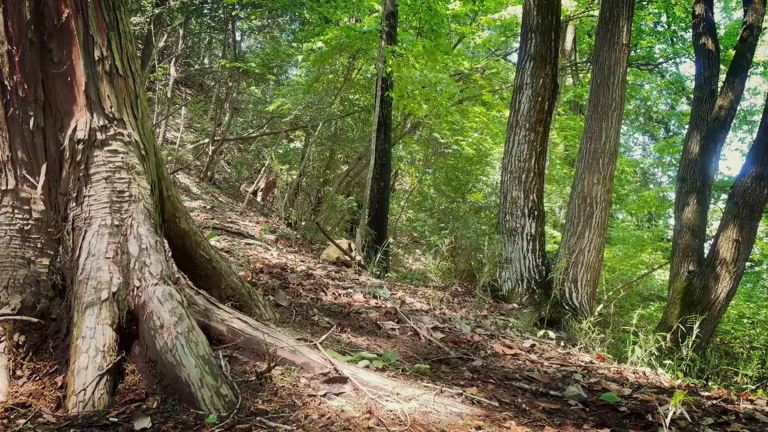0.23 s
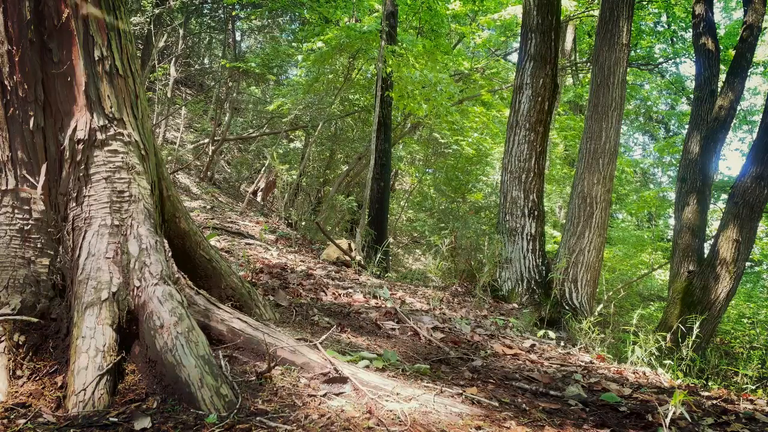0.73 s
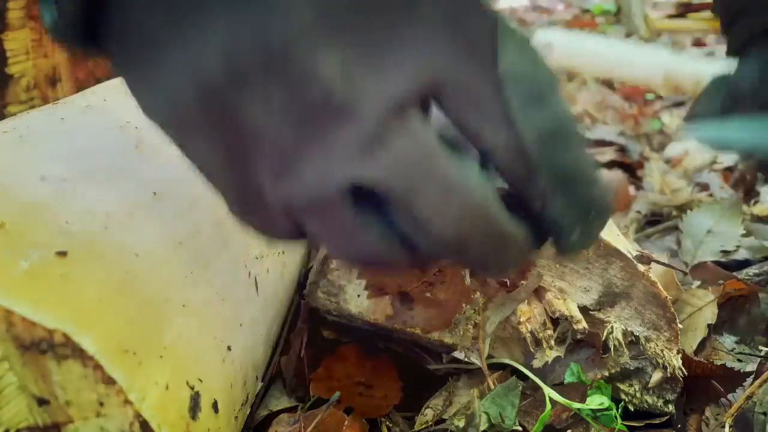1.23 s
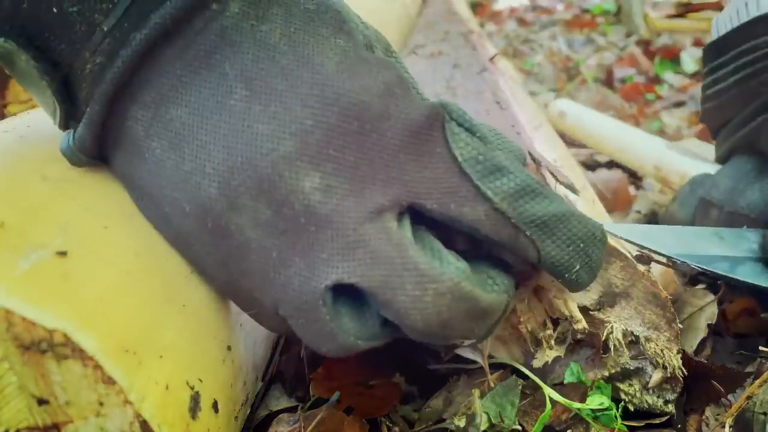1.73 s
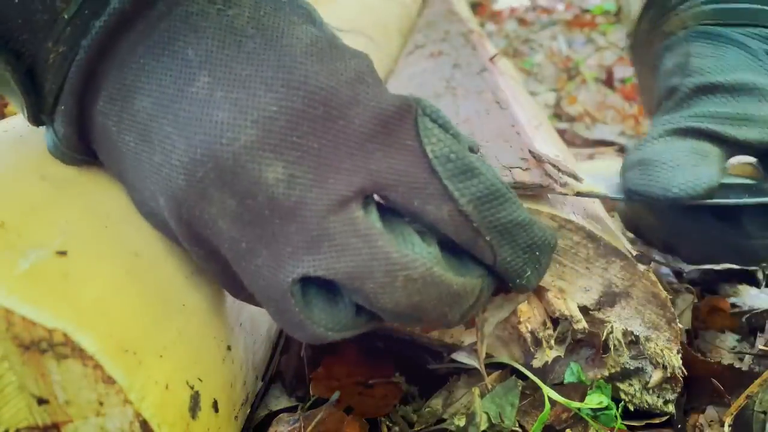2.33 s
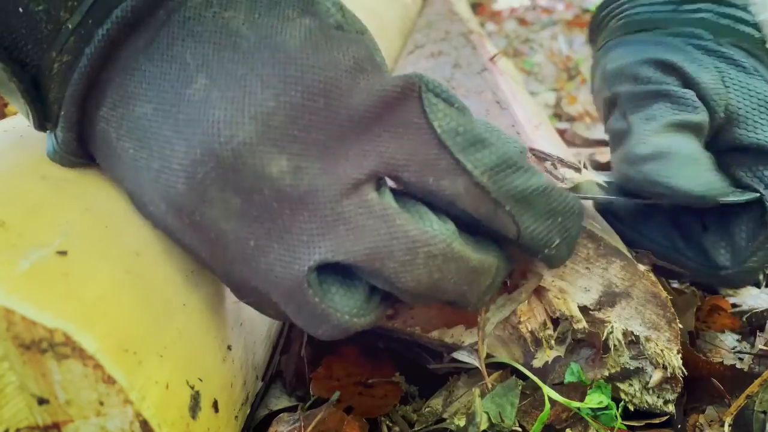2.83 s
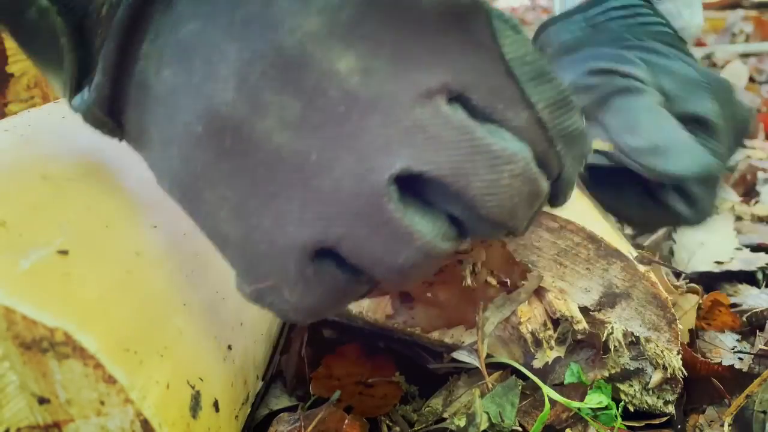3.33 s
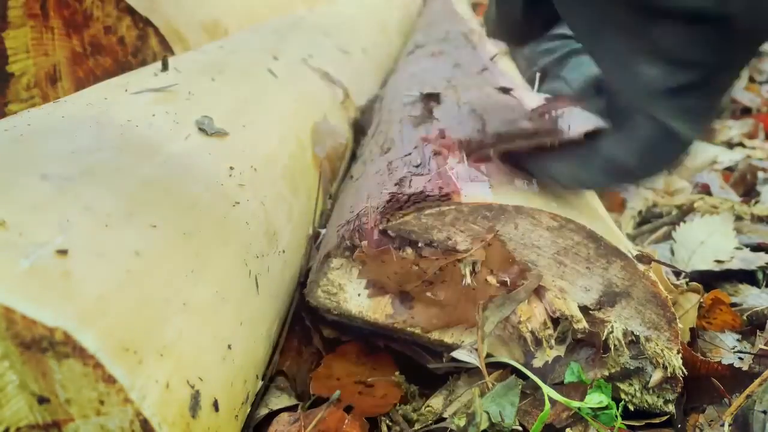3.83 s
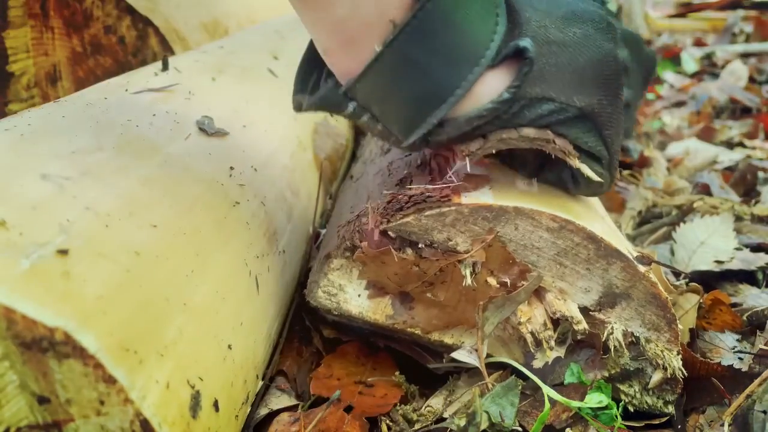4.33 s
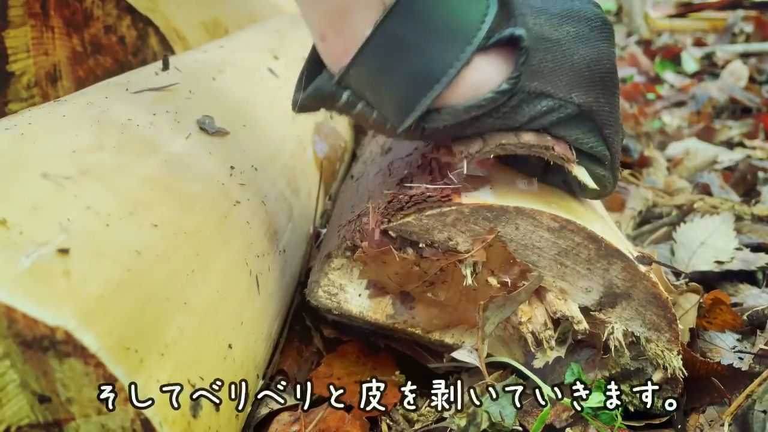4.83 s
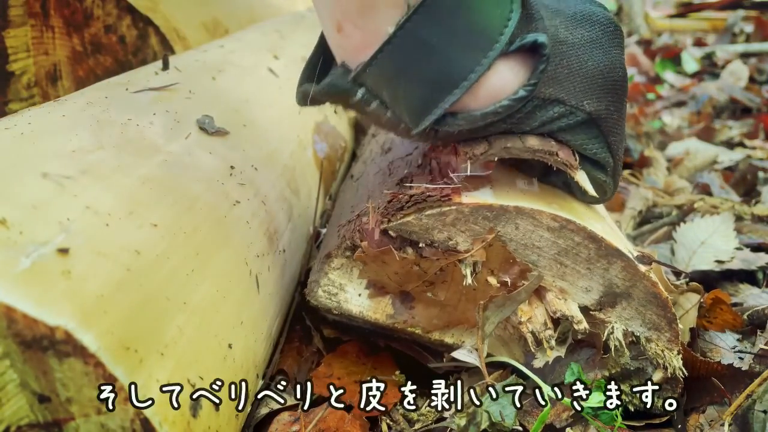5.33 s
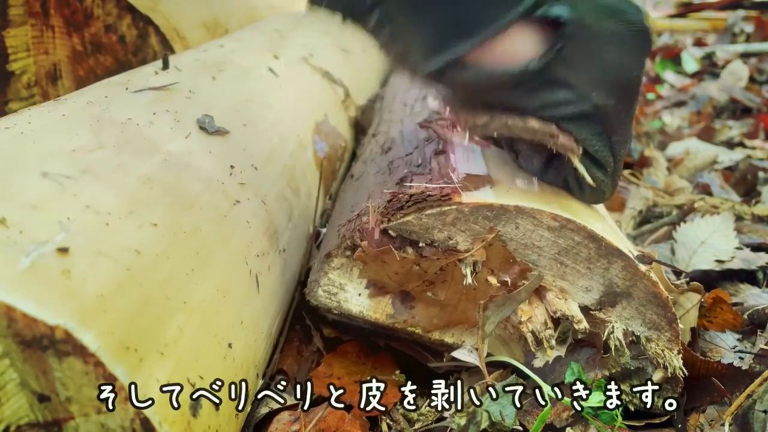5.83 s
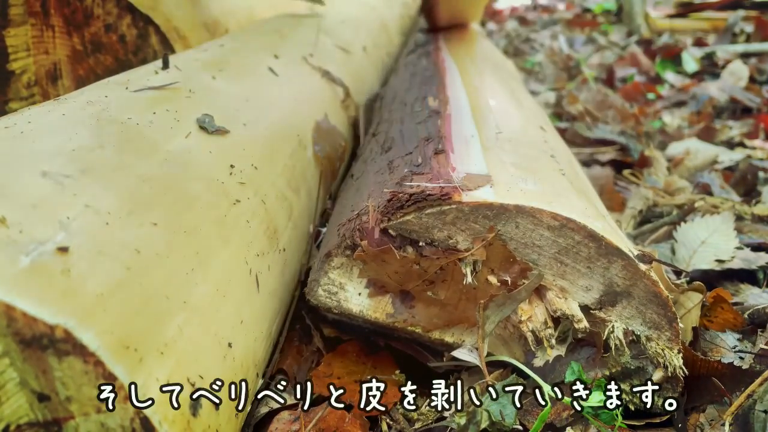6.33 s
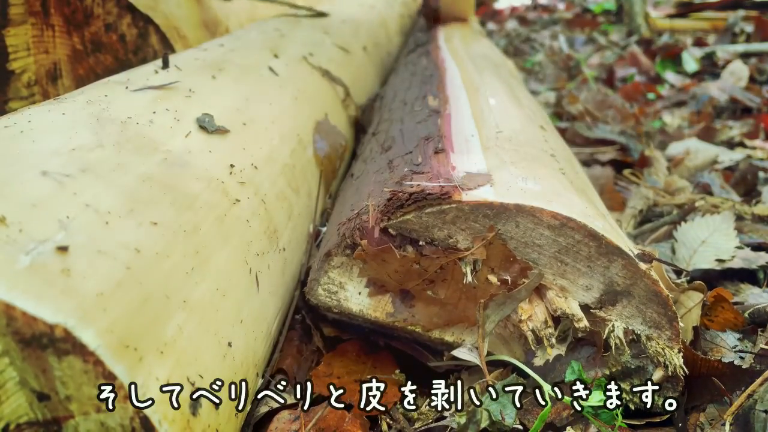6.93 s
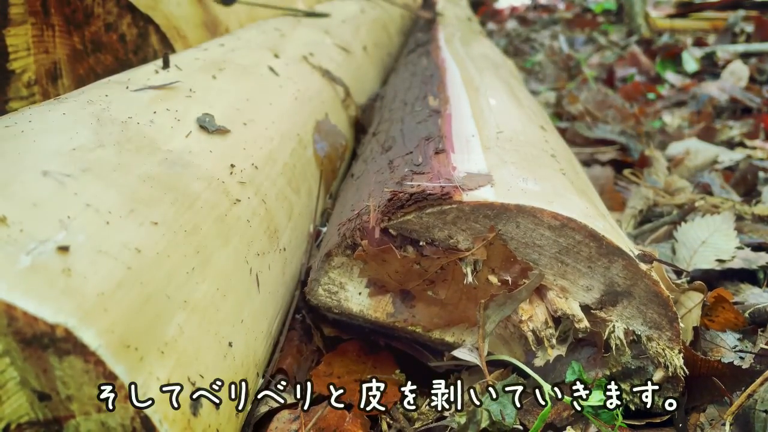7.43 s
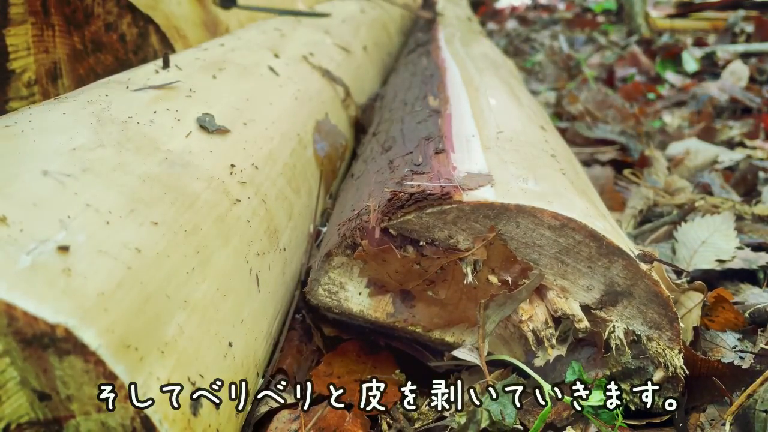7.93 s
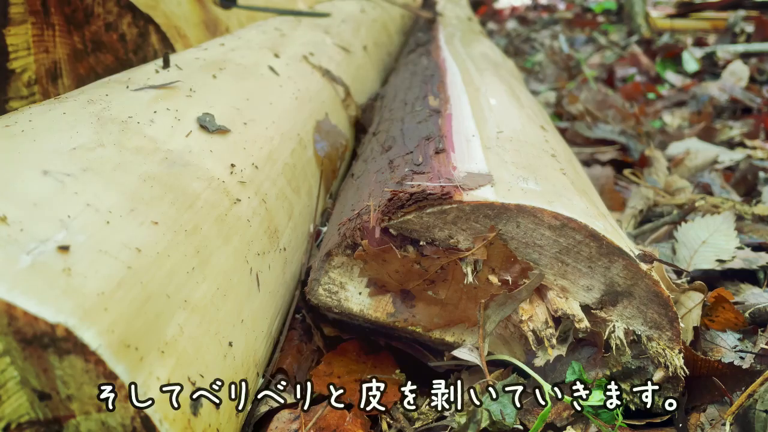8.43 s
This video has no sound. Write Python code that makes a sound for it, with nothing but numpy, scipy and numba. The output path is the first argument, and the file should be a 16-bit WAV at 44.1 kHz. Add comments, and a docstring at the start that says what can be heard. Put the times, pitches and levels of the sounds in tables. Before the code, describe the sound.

Leaves hiss in a light breeze and a small bird whistles briefly. An abrupt cut brings close, dry log work: soft glove rubs, dull wooden knocks, a short blade scrape and a small crackling peel. A knife clatters onto the wood, then a long bark strip rips away with dense sharp snaps. Faint rubbing follows over a low outdoor rumble, heard through a close stereo microphone.

```python
"""A forest hisses (filtered noise) and a small bird calls (gliding sines); then, close up, gloves rub a log.
Blade knocks ring the log's modes, the edge scrapes under the bark and a first flap is peeled (break trains).
The knife clatters down on the wood, waking its steel modes; then a long strip rips off: a dense crackle of
fibre breaks with loud single snaps, ringing the log. Rubs and small knocks follow over a low rumble."""
import sys
import numpy as np
from scipy import signal
from scipy.fft import rfft, irfft, next_fast_len
from scipy.io import wavfile
from numba import njit

SR = 44100
rng = np.random.default_rng(int(sys.argv[2]) if len(sys.argv) > 2 else 0)


def persist_wave(psi):
    """Save psi, clipped to +-1, as 16-bit WAV."""
    counts = np.round(np.clip(psi, -1, 1) * 32767).astype(np.int16)
    wavfile.write(sys.argv[1], SR, np.atleast_2d(counts).T)


N = 383669
TIME = np.arange(N) / SR
HIT_TIME = TIME[:SR // 2]

# modes of the log: mode_hz, level_db, t60_s
LOG_MODES = [(137, -9.5, .25), (205.2, 0.5, 0.34), (266, -12, 0.11), (323.8, -3, 0.36), (379.6, -1, .19),
             (490, -7, 0.051), (572, -5, 0.24), (674, -1.5, .06), (759.5, -2.5, 0.18), (830, -6.5, 0.054),
             (954.5, -9, 0.21), (1090, -3.5, 0.18), (1210, -3, .06), (1540, -2, 0.08), (1920, -4.5, 0.063)]
# spectrum of steel or crumbs on bark: freq_hz, level_db (per Hz)
STEEL_ON_BARK = [(100, 10), (350, -12), (1000, -10), (2200, -4), (4000, 0), (7000, 0), (10000, 4.5),
                 (12800, -3.5), (15500, -1)]


def undb(db):
    """Decibels to gain."""
    return np.exp(np.asarray(db) * np.log(10) / 20)


def unit(x):
    """Scale to rms 1."""
    return x / np.sqrt(np.mean(x ** 2))


def along(points, hz):
    """Read (Hz, value) points on a log-frequency axis."""
    f, value = np.transpose(points)
    return np.interp(np.log(hz + 1), np.log(f), value)


def colour(x, points):
    """Filter a sound by (Hz, dB) points."""
    size = next_fast_len(N, True)
    gain = undb(along(points, np.fft.rfftfreq(size, 1 / SR)))
    return irfft(rfft(x, size) * gain, size)[:N]


def walk(rate):
    """Random wander of spread near 1: straight lines between `rate` points per second."""
    steps = rng.standard_normal(N // 10)
    return np.interp(TIME * rate, np.arange(len(steps)), steps)


def add(track, s, sound):
    """Mix a sound in at time s."""
    i = int(s * SR)
    track[i:i + len(sound)] += sound[:N - i]


def hump(hz, centre_hz, octaves):
    """A bell-shaped weight on the octave axis."""
    return np.exp(-.5 * (np.log2((hz + 1) / centre_hz) / octaves) ** 2)


def stroke(start_s, length_s, attack_s, release_s):
    """Gain of one movement: it swells up to its start, holds for its length, then dies away."""
    early = np.maximum(start_s - TIME, 0)
    late = np.maximum(TIME - start_s - length_s, 0)
    return np.exp(-early / attack_s - late / release_s)


def strokes(rows, attack_s, release_s):
    """Gain of (start_s, length_s, level_db) movements of one shape; overlaps add in power."""
    power = sum((undb(db) * stroke(s, length, attack_s, release_s)) ** 2 for s, length, db in rows)
    return np.sqrt(power)


def grains(rate, spread_db, clump_db, clump_rate):
    """Tiny breaks of very uneven size that come in clumps; rms 1."""
    sizes = undb(spread_db * np.minimum(rng.exponential(size=N), 4))
    breaks = (rng.random(N) < rate / SR) * rng.choice([-1, 1], N)
    return unit(breaks * sizes * undb(clump_db * walk(clump_rate)))


def ring(modes, weight=1, length=1, wobble_db=2.5, size=256):
    """Modes after one blow; each contact shifts them a little, loose contacts make the decay uneven."""
    wobble_per_s = 65
    hz, db, t60 = np.transpose(modes)
    hz = hz * (1 + .002 * rng.standard_normal(len(hz)))
    phase = rng.uniform(0, 2 * np.pi, (len(hz), 1))
    walks = rng.standard_normal((len(hz), size))
    wobble = np.array([np.interp(HIT_TIME * wobble_per_s, np.arange(size), steps) for steps in walks])
    wobble = wobble * np.minimum(HIT_TIME * wobble_per_s, 1)
    fall_db = wobble_db * wobble - 60 * HIT_TIME / (length * t60[:, None])
    tones = np.sin(2 * np.pi * hz[:, None] * HIT_TIME + phase)
    return (undb(db) * weight) @ (tones * undb(fall_db))


def crack(hz, octaves, tail_s, tail_db, bend_s, size=4096):
    """A click and its short scatter, peak 1; bending waves bring the treble first."""
    f = np.fft.rfftfreq(size, 1 / SR)
    push = undb(tail_db) * rng.standard_normal(size) * np.exp(-TIME[:size] / tail_s)
    push[0] += 1
    delay = bend_s * np.sqrt(hz / (f + 1))
    click = irfft(rfft(push) * hump(f, hz, octaves) * np.exp(-4j * np.pi * f * delay))
    return click / np.abs(click).max()


def friction(force, spectrum, log_db):
    """A train of small breaks, heard directly and through the log, whose ring the hand shortens."""
    direct = colour(force, spectrum)
    weight = hump(np.transpose(LOG_MODES)[0], 720, octaves=1.1)
    body = signal.fftconvolve(force, ring(LOG_MODES, weight, length=0.72))[:N]
    return (unit(direct) + undb(log_db) * unit(body)) * np.sqrt(np.mean(force ** 2))


@njit
def resonate(x, hz, width):
    """A state-variable band-pass whose centre moves."""
    y, band, low = np.empty(len(x)), 0., 0.
    for i in range(len(x)):
        g, k = np.tan(np.pi * hz[i] / SR), width / hz[i]
        v = (band + g * (x[i] + 1e-18 - low)) / (1 + g * (g + k))
        band, low, y[i] = 2 * v - band, low + 2 * g * v, k * v
    return y


def flap(force, start_s, start_hz, climb_hz_per_s):
    """Fibre breaks ring the lifted bark, higher as it is drawn taut."""
    hz = np.clip(start_hz + climb_hz_per_s * (TIME - start_s), 2000, 9000)
    tone = unit(resonate(force, hz, 2600.0))  # width in Hz
    return undb(-5) * tone * np.sqrt(np.mean(force ** 2))


def tearing():
    """A slow peel parts fine fibres; the hard rip parts them in bunches and breaks duller splinters too."""
    # spectra of the breaks: freq_hz, level_db (per Hz)
    fibre_spectrum = [(60, 9), (200, -5), (900, -17), (1400, -12.5), (2100, -7.5), (3000, -10), (4800, 2.5),
                      (6500, -1.5), (8300, -1.5), (10500, 1.5), (12600, -14), (15300, -26)]
    splinter_spectrum = [(60, -17), (190, -5.5), (450, -6), (1000, -6), (1500, 2), (2050, -19), (3200, 1),
                         (6000, -11.5), (15500, -15.5)]
    # pulls of the slow peel: start_s, length_s, level_db
    peel_pulls = [(4.431, 0.17, -39.5), (4.68, 0.11, -41.5)]
    # the strip catches, a brief dip: centre_s, half_width_s (to 1/e of depth), depth_db
    catches = [(7.031, .004, -6), (7.084, .004, -8), (7.101, .005, -8.5), (7.182, .006, -5.5),
               (7.211, .006, -3), (7.313, .005, -3)]
    # the strip starts to lift, runs free, parts from the log
    rip_start_s, rip_free_s, rip_end_s = 6.92, 7.112, 7.334

    pull = strokes(peel_pulls, attack_s=0.041, release_s=0.0165)
    peel = pull * grains(rate=3500, spread_db=1.5, clump_db=1.0, clump_rate=260)

    rip = stroke(rip_start_s, rip_end_s - rip_start_s, attack_s=0.024, release_s=0.003)
    dip_db = sum(db * np.exp(-((TIME - s) / half_width) ** 2) for s, half_width, db in catches)
    rip = rip * undb(dip_db)
    until_free_s = np.maximum(rip_free_s - TIME, 0)
    since_free_s = np.maximum(TIME - rip_free_s, 0)
    # fibres grow louder as the strip gathers speed, then hold; splinters fall off once it runs free
    fine_db = -27 - 50.5 * until_free_s
    coarse_db = -31.5 - 31.5 * until_free_s - 53.5 * since_free_s
    fine = rip * undb(fine_db) * grains(rate=3000, spread_db=3.0, clump_db=2.5, clump_rate=500)
    coarse_gain = rip * undb(coarse_db) + pull * undb(-15)
    coarse = coarse_gain * grains(rate=900, spread_db=5.0, clump_db=2.0, clump_rate=200)

    out = flap(peel, peel_pulls[0][0], start_hz=3950, climb_hz_per_s=5800)
    out = out + flap(fine, rip_start_s, start_hz=3300, climb_hz_per_s=7500)
    out = out + friction(peel, fibre_spectrum, log_db=-18.5)
    out = out + friction(fine, fibre_spectrum, log_db=-20.0)
    return out + friction(coarse, splinter_spectrum, log_db=-12.5)


def snaps():
    """Thick fibres fray for an instant, then let go one at a time, each a pitched tick of a few cycles."""
    # snapping fibres and splinters: time_s, peak_db, pitch_hz, spread_octaves
    snap_rows = [(2.72, -33, 1800, .9), (3.425, -15, 7000, .7), (3.686, -30.5, 2300, 1),
                 (3.820, -30, 3000, .7), (4.511, -20, 4500, .6), (4.552, -14, 7960, .8),
                 (4.5973, -25, 8300, .7), (4.662, -29, 4800, .7), (4.671, -20.5, 8200, .7),
                 (4.723, -19.5, 6000, .7), (5.185, -25, 7800, .9), (6.136, -22.5, 3860, 1),
                 (6.562, -21.5, 4300, .9), (6.641, -18.5, 7400, .7), (6.662, -5.5, 3480, 1.04),
                 (6.714, -28, 4054, .7), (6.875, -14.5, 3800, 1), (6.8986, -15.5, 5800, .9),
                 (6.9042, -10, 3350, 1), (6.922, -13, 4200, .7), (6.93, -13, 2800, .8),
                 (6.9348, -10.5, 5000, .7), (6.943, -17, 6000, .7), (6.956, -7.5, 3100, .65),
                 (6.9782, -5, 5000, .8), (6.9804, -9.5, 5400, .7), (7.001, -17, 3000, .6),
                 (7.013, -12.5, 6500, .8), (7.0193, -11.5, 5200, .7), (7.028, -15.5, 5000, .9),
                 (7.0403, 0, 4200, 1), (7.0447, -13, 1800, .9), (7.0533, -5.5, 6500, .9),
                 (7.0603, -4.5, 3200, .9), (7.081, 0.5, 5400, 1.1), (7.1066, -2.5, 5500, 1.1),
                 (7.125, -10.5, 4200, .7), (7.132, -2, 4700, .8), (7.137, -9, 3800, .7),
                 (7.143, -7.5, 6400, .7), (7.1487, -7, 3600, .9), (7.1562, -3.5, 5000, .8),
                 (7.1583, -5, 4900, .8), (7.172, -8.5, 5500, .9), (7.195, -11, 4250, .6),
                 (7.2266, -1, 4700, .75), (7.2273, -2.5, 4500, .75), (7.246, -12.5, 5500, .8),
                 (7.275, -12.5, 5500, .8), (7.289, -13, 5000, .7), (7.328, -11, 5000, .8),
                 (7.3333, -11, 6000, .9), (7.770, -28.5, 3300, .7), (7.921, -34, 6970, .7),
                 (8.331, -25.5, 7000, 1.2), (8.357, -38, 5700, .7)]
    fray_s, fray_db = .0012, -18.5  # lead before the snap, level relative to it
    out = np.zeros(N)
    for s, db, hz, octaves in snap_rows:
        fray = crack(hz, octaves=1.7, tail_s=0.0017, tail_db=-8.0, bend_s=0.000287)
        add(out, s - fray_s, undb(db + fray_db) * fray)
        add(out, s, undb(db) * crack(hz, octaves, tail_s=0.0012, tail_db=-17, bend_s=0.00035))
    return out


def thud(hz, octaves, t60):
    """Modes too dense and damped to tell apart: a short dull noise burst."""
    size = len(HIT_TIME)
    weight = hump(np.fft.rfftfreq(size, 1 / SR), hz, octaves)
    burst = irfft(rfft(rng.standard_normal(size)) * weight, size)
    return unit(burst) * np.exp(-np.log(1000) * HIT_TIME / t60)


def knocks():
    """Blade, knuckles and recoiling strip jolt the log: a dull click, a thud, the modes the spot favours."""
    # blows; a hand on the log shortens the ring: time_s, contact_peak_db, contact_hz,
    # ring_db, ring_hz, ring_spread_octaves, ring_length_share
    blows = [(1.3897, -26, 1510, -36.5, 600, 0.62, 0.14), (1.756, -33, 890, -38, 680, .6, 0.18),
             (2.3086, -26, 1130, -40.5, 760, 0.77, 0.3), (2.418, -25.5, 1350, -38.5, 740, .3, 0.47),
             (2.671, -32, 1260, -50, 740, .5, 0.27), (3.347, -47, 800, -42, 445, 1.1, 0.82),
             (3.4898, -16, 1820, -27.5, 696, 0.44, 0.31), (4.187, -51, 700, -44.5, 350, 1.3, 0.19),
             (4.757, -26.5, 1290, -45, 740, 0.61, 0.3), (4.801, -35, 716, -45.5, 414, 1.1, 1.03),
             (5.138, -33.5, 1100, -45.5, 670, 0.8, 0.48), (6.135, -28, 1560, -36, 270, 1.2, 0.53),
             (6.2634, -16, 990, -26.5, 500, 0.96, 0.84), (6.345, -48, 1200, -42, 930, 1, 1.05),
             (6.449, -23, 1720, -36.5, 845, 0.88, 0.67), (6.491, -24, 1370, -35, 1150, 0.73, 1.57),
             (6.604, -23, 1490, -41, 640, 1.1, 0.91), (7.043, -22, 600, -36, 300, 1.3, 0.49),
             (7.148, -16, 1080, -39.5, 350, 1, 0.99), (7.331, -52, 354, -34.5, 160, 1.18, 0.79),
             (7.4888, -30, 870, -34.5, 450, 1.1, 0.065), (8.311, -49, 495, -38, 300, 0.4, 0.22)]
    out = np.zeros(N)
    swell = 1 - np.exp(-HIT_TIME / 0.0003)  # s, the blow pushes into the wood
    mode_hz = np.transpose(LOG_MODES)[0]
    for s, db, hz, ring_db, ring_hz, octaves, length in blows:
        share = max(length, .05)
        modes = ring(LOG_MODES, hump(mode_hz, ring_hz, octaves), share)
        body = undb(-5.5) * thud(0.85 * ring_hz, octaves=1.0, t60=.07 * np.sqrt(share))
        add(out, s, undb(db) * crack(hz, octaves=0.84, tail_s=0.0021, tail_db=-23.5, bend_s=0.00078))
        add(out, s, undb(ring_db) * swell * (modes + body))
    return out


def knife():
    """Each touch chatters briefly and wakes a different range of the steel's modes; the wood damps them."""
    # modes of the knife: mode_hz, level_db, t60_s
    steel_modes = [(1404, -4, 0.19), (1577, -10.5, .09), (2120, -3, 0.15), (2514, -10.5, 0.15),
                   (2780, -13, 0.11), (3370, -0.5, 0.05), (3570, 4, 0.019), (3892, -10.5, 0.13),
                   (4250, -5, 0.045), (4880, 2.5, 0.055), (5520, -11, 0.037), (6150, 2, 0.04),
                   (6600, -1.5, 0.071), (7250, 5.5, 0.034), (10100, 2, .025)]
    # touches as it is laid down: time_s, ring_db, ring_centre_hz, spread_octaves,
    # contact_peak_db, contact_hz, ring_length_share
    touches = [(6.264, -38, 5130, 1.4, -13, 6970, 0.62), (6.288, -25, 5900, 1.34, -13, 8100, 0.72),
               (6.307, -27.5, 5200, 0.71, -28, 7000, 0.64), (6.343, -49, 1300, 1.4, -39, 1800, 0.89),
               (6.433, -32.5, 2320, 0.67, -36, 3200, 0.52), (6.4494, -24.5, 2730, 0.57, -19, 3970, 0.68),
               (6.492, -29.5, 2900, 0.32, -28, 3900, 1), (6.603, -24.5, 2450, 1.07, -24, 5200, 0.93)]
    out = np.zeros(N)
    swell = 1 - np.exp(-HIT_TIME / 0.00084)
    mode_hz = np.transpose(steel_modes)[0]
    for s, db, hz, octaves, contact_db, contact_hz, length in touches:
        # steel rings more evenly than wood
        modes = ring(steel_modes, hump(mode_hz, hz, octaves), max(length, .05), wobble_db=2)
        contact = crack(contact_hz, octaves=0.9, tail_s=0.0037, tail_db=-10.0, bend_s=0.00024)
        add(out, s, undb(db) * swell * modes)
        add(out, s, undb(contact_db) * contact)
    return out


def blade():
    """The edge slides under the bark with a fine, bright rasp: a dense train of breaks."""
    # slides, before the 5 dB lift below: start_s, length_s, level_db
    slides = [(3.347, 0.12, -38.5)]
    push = strokes(slides, attack_s=0.014, release_s=0.016)
    rasp = push * grains(rate=9000, spread_db=3.0, clump_db=4.0, clump_rate=110)
    return undb(5) * friction(rasp, STEEL_ON_BARK, log_db=-24)


def gloves():
    """Knitted gloves shift and rub over the bark; the sleeves add a softer, duller brushing."""
    # spectra of glove and sleeve: freq_hz, level_db (per Hz)
    glove_spectrum = [(100, 13), (300, 8), (700, 4), (1500, 1.5), (3200, 3), (6000, 1), (9000, 4),
                      (12500, -1.5), (15500, -7)]
    cloth_spectrum = [(60, -11.5), (300, 5), (900, -8.5), (2300, 3.5), (3800, -12), (7000, -9),
                      (15500, -27)]
    # glove slides, before the 5 dB lift below: start_s, length_s, level_db
    rubs = [(1.17, 0.13, -66.5), (1.33, 0.029, -60), (1.485, 0.14, -56), (1.87, 0.09, -50),
            (1.68, 0.54, -65.5), (2.255, 0.022, -55), (2.34, 0.038, -60), (2.663, 0.017, -50),
            (2.72, 0.51, -64), (3.53, 0.31, -62), (3.825, 0.14, -58), (4.105, 0.093, -54.5),
            (4.895, 0.023, -57), (5.15, 0.071, -63.5), (5.55, 0.059, -53.5), (5.93, .15, -64),
            (6.17, 0.52, -63.5), (6.64, 0.11, -55.5), (6.85, 0.022, -56), (7.38, 0.48, -64),
            (7.76, 0.0092, -52.5), (8.03, 0.023, -56), (8.245, 0.0092, -55), (8.325, 0.045, -57.5),
            (8.44, 0.014, -59)]
    # a sleeve brushing as an arm moves: start_s, length_s, level_db
    sleeves = [(2.72, 0.49, -64), (3.53, 0.29, -65), (5.85, 0.18, -59), (7.42, 0.3, -60.5)]

    # the gloves never lie quite still; fades in up to the first rub
    grip = undb(-74 + 4 * walk(rate=9.8)) * np.minimum(TIME / rubs[0][0], 1) ** 2
    rub_gain = np.hypot(grip, strokes(rubs, attack_s=0.022, release_s=0.011))
    rub = rub_gain * grains(rate=3000, spread_db=2.0, clump_db=2.5, clump_rate=140)
    brush_gain = strokes(sleeves, attack_s=.04, release_s=0.12)
    brush = brush_gain * grains(rate=9400, spread_db=3.5, clump_db=6.5, clump_rate=33)
    rubbing = undb(5.0) * friction(rub, glove_spectrum, log_db=-21.5)
    return rubbing + friction(brush, cloth_spectrum, log_db=-26)


def crumbs():
    """Loose crumbs of bark tick under the hands: sparse random breaks."""
    ticks = grains(rate=19, spread_db=3.5, clump_db=-7.5, clump_rate=4.5)
    return undb(-71) * friction(ticks, STEEL_ON_BARK, log_db=-21.0)


def scatter(x, t60, build_s):
    """Many small reflections that build up and die away, different at each port."""
    decay = np.exp(-np.log(1000) * HIT_TIME / t60)
    build = 1 - np.exp(-HIT_TIME / build_s)
    tails = rng.standard_normal((2, len(HIT_TIME))) * decay * build
    return np.array([signal.fftconvolve(x, tail / np.linalg.norm(tail))[:N] for tail in tails])


def bird():
    """Thin whistles, mostly falling, with a quick flutter, drawn out by the trunks."""
    # bird notes, before the direct and scattered gains: start_s, length_s, first_hz, last_hz, level_db
    notes = [(0.657, 0.072, 4420, 4265, -46.5), (0.725, 0.096, 4290, 4260, -53),
             (.842, .025, 4320, 4320, -52), (0.716, 0.066, 5220, 4990, -48), (.785, .09, 5090, 5500, -58)]
    out = np.zeros(N)
    flutter = 1 + 0.007 * walk(rate=350)
    for s, length, first_hz, last_hz, db in notes:
        hz = np.linspace(first_hz, last_hz, int(length * SR))
        phase = 2 * np.pi * np.cumsum(hz * flutter[int(s * SR):][:len(hz)]) / SR
        add(out, s, undb(db) * np.sqrt(np.hanning(len(hz))) * np.sin(phase))
    return 0.71 * out + 0.68 * scatter(out, t60=.65, build_s=0.0082)


def air(spectrum, width, sway_db):
    """Outdoor noise whose level sways; long waves reach both ports alike."""
    mid, side = (unit(colour(rng.standard_normal(N), spectrum)) * undb(sway_db * walk(rate=8))
                 for _ in range(2))
    side = colour(side, [(60, -14), (400, 0)])
    return mid + width * side * np.array([[1], [-1]])


def breeze():
    """Wind in the trees eases off, with two small gusts; the leaves overhead hiss on."""
    # spectra of wind and leaves: freq_hz, level_db (per Hz)
    wind_spectrum = [(22, -24), (50, 7), (90, 9.5), (170, 3), (280, -2), (360, -2.5), (750, -4),
                     (1400, -8.5), (1900, -6.5), (2400, -7.5), (3000, -19), (6000, -20), (15500, -50)]
    leaf_spectrum = [(3000, -8.5), (4200, -3), (5300, 0), (7200, -4.5), (10000, -11), (12800, -14),
                     (14500, -45)]
    # gusts: start_s, length_s, level_db
    gusts = [(.095, 0.032, -53.5), (.46, 0.054, -57.5)]
    wind = undb(-47.5 - 5.5 * TIME) + strokes(gusts, attack_s=0.015, release_s=0.0085)
    hiss = undb(-59.5) * air(leaf_spectrum, width=0.56, sway_db=0.5)
    return wind * air(wind_spectrum, width=0.52, sway_db=0.4) + hiss


def outdoors():
    """A low rumble that swells and sinks under a faint, wavering hush."""
    # spectra of rumble and hush: freq_hz, level_db (per Hz)
    rumble_spectrum = [(20, -30.5), (31, -6.5), (42, -2), (68, 5.5), (100, -1.5), (180, -6.5), (350, -18.5),
                       (800, -35), (3000, -69)]
    hush_spectrum = [(100, -12.5), (350, 1), (800, -3.5), (2000, -7), (5000, -17.5), (10000, -28.5),
                     (15500, -48)]
    rumble = undb(-54) * air(rumble_spectrum, width=0.7, sway_db=2.5)
    return rumble + undb(-68.5) * air(hush_spectrum, width=1.0, sway_db=4.1)


def ports(x, phase, balance):
    """Two microphone ports that differ in level and in phase, by frequency."""
    hz = np.fft.rfftfreq(N, 1 / SR)
    lean = undb(along(balance, hz) / 2)
    return irfft(rfft(x) * np.array([lean * np.exp(1j * phase(hz)), 1 / lean]), N)


def scene():
    """The open forest first, then the work on the log over a low rumble."""
    cut_s = .878  # the open forest gives way to the spot by the log
    # wind from the right, leaf hiss on the left: freq_hz, left_minus_right_db
    forest_balance = [(60, 2), (200, 0), (700, -8), (1400, -6), (1800, -.5), (2500, -3), (4400, 1),
                      (6000, 7), (8000, 0)]
    # ports at the log: freq_hz, left_lead_rad
    port_phase = [(20, 0), (5000, 0), (5700, -.2), (6900, -1.2), (8200, -3.1), (9600, -4.3), (11000, -5.6),
                  (12400, -6.4), (13800, -9), (15500, -9.4)]
    # ports at the log: freq_hz, left_minus_right_db
    port_balance = [(60, 1.2), (200, 2.8), (700, 3.6), (2400, 3.2), (4400, 3.1), (7500, .4), (15000, 0)]
    left_lag_s = .00042  # in the forest
    forest = ports(breeze() + bird(), lambda hz: -2 * np.pi * hz * left_lag_s, forest_balance)

    wood = knocks()
    work = gloves() + crumbs() + blade() + tearing() + snaps() + wood + knife()
    # hands and bark reflect at once, and differently as they move; the trees answer later
    shifting = np.array([walk(rate=40), walk(rate=40)])
    near = undb(-8.5) * shifting * scatter(work, t60=.008, build_s=.0003)
    far = undb(-22.5) * scatter(work, t60=0.12, build_s=0.013)
    # the whole log radiates, so each port hears its ring a little differently
    spread = undb(-8.5) * scatter(wood, t60=0.016, build_s=0.0018)
    close = undb(-2.0) * work + spread + near + far + outdoors()
    close = ports(close, lambda hz: along(port_phase, hz), port_balance)
    return np.where(TIME < cut_s, forest, close)


def record(dry):
    """Cut the deep rumble below 42 Hz and the top above 15850 Hz."""
    low_cut = signal.butter(4, 42, "high", fs=SR, output="sos")
    top_cut = signal.ellip(10, .2, 80, 15850, fs=SR, output="sos")
    return signal.sosfilt(np.vstack([low_cut, top_cut]), dry)


dry = scene()
out = record(dry)
persist_wave(out)
```